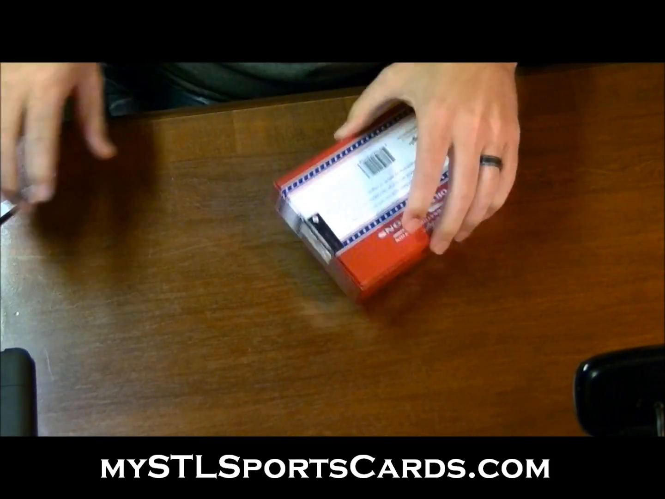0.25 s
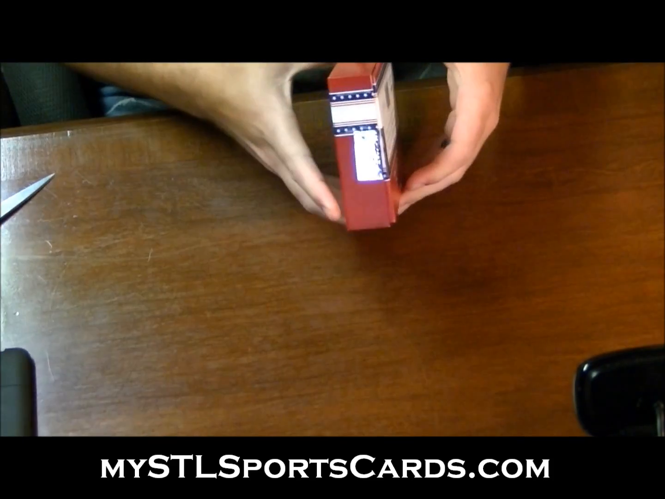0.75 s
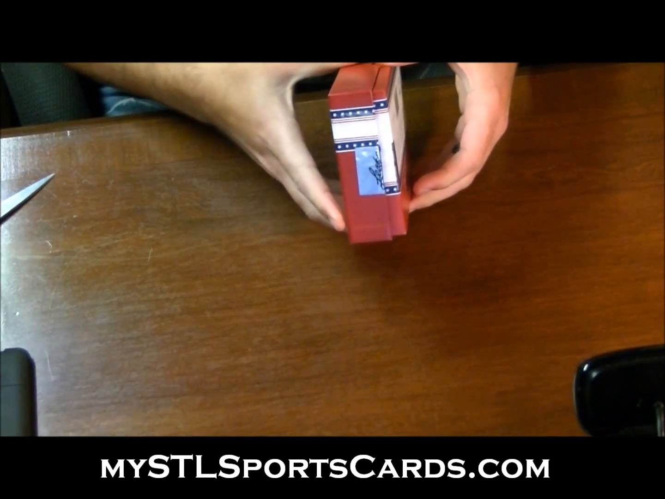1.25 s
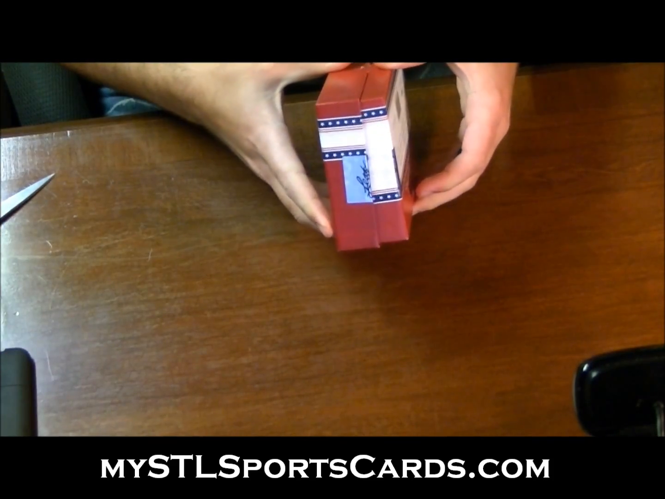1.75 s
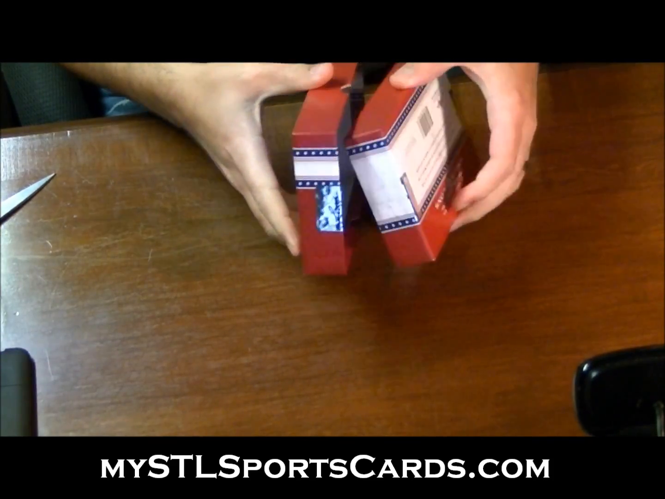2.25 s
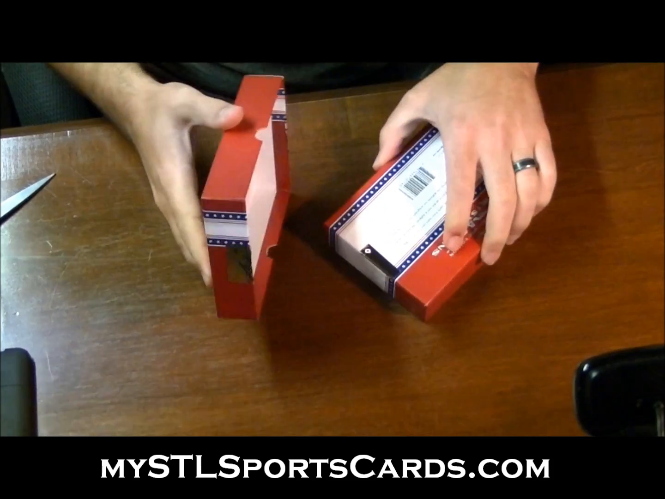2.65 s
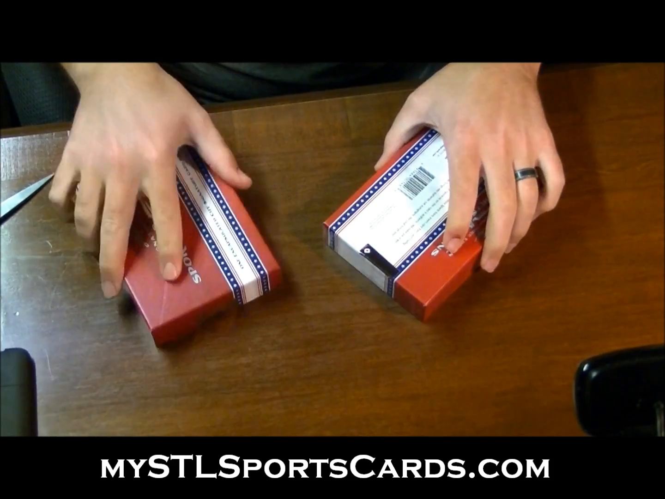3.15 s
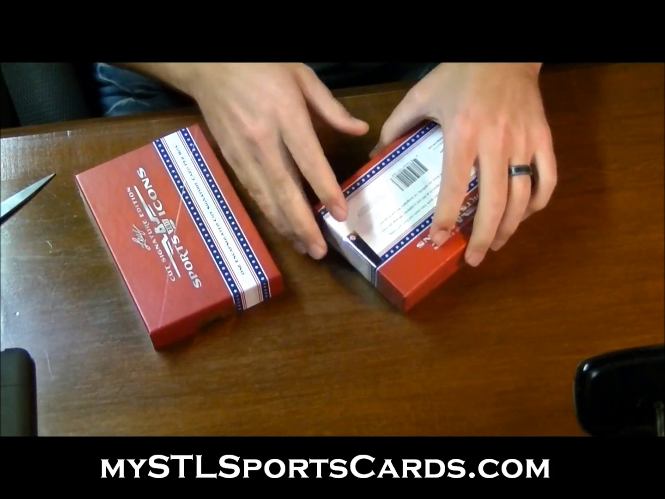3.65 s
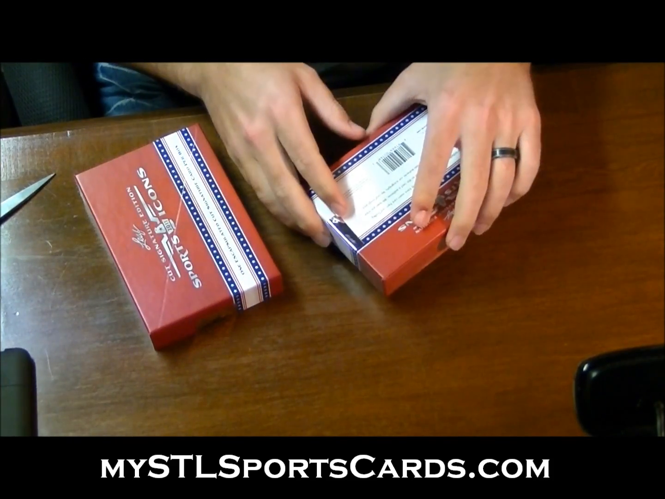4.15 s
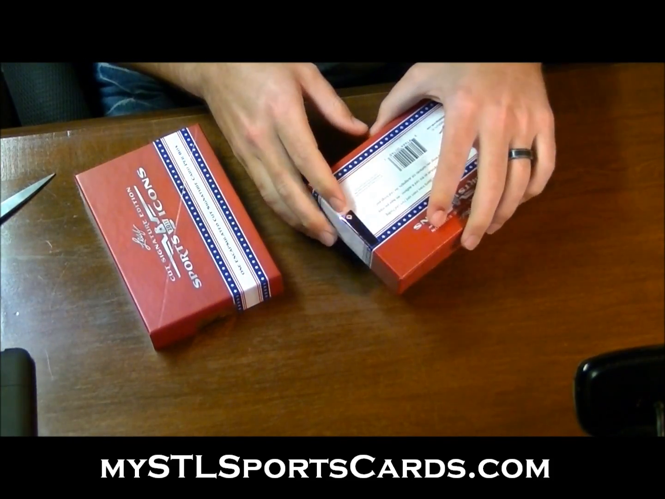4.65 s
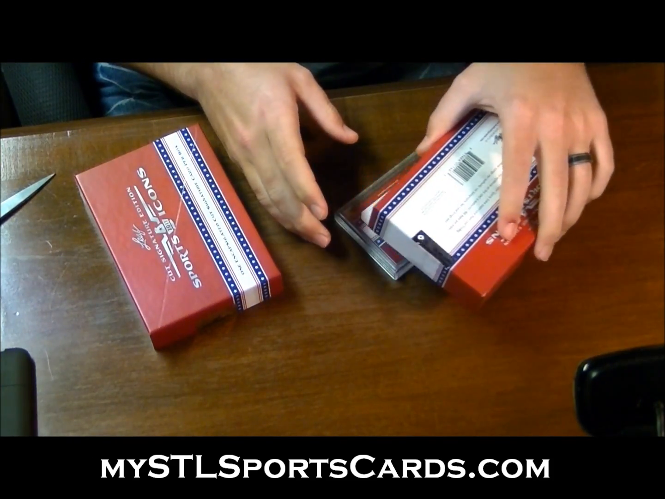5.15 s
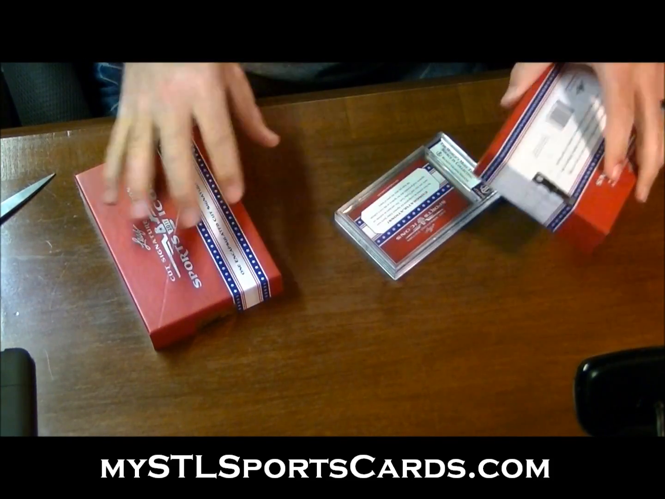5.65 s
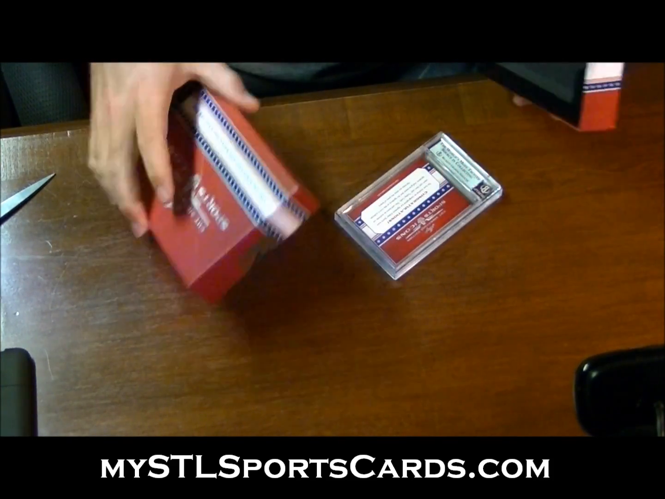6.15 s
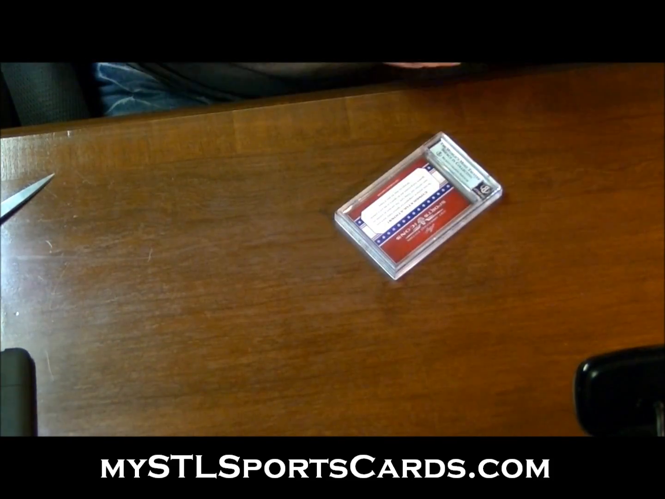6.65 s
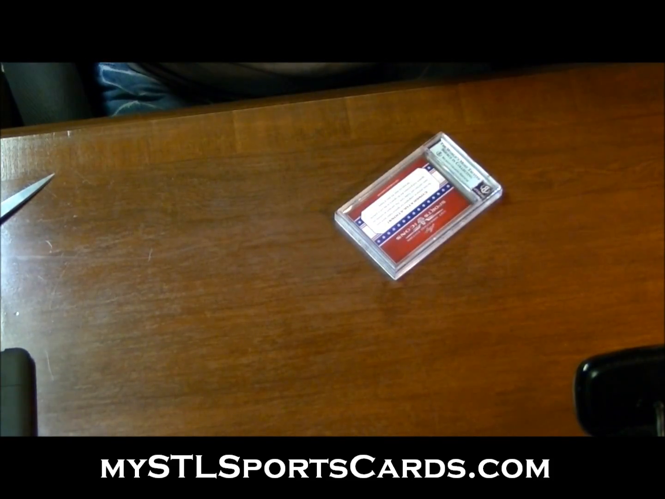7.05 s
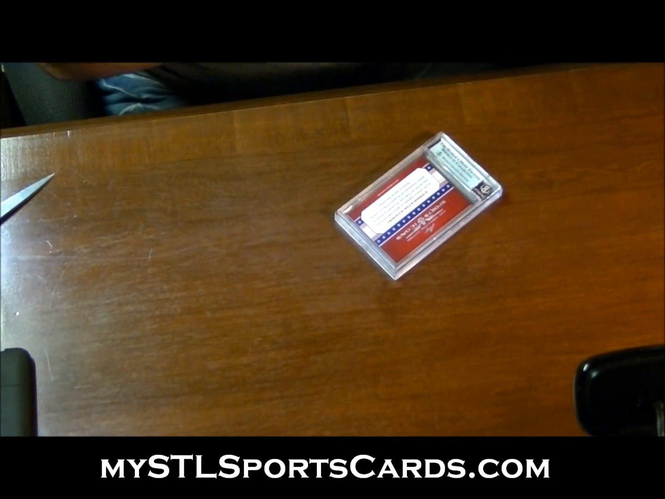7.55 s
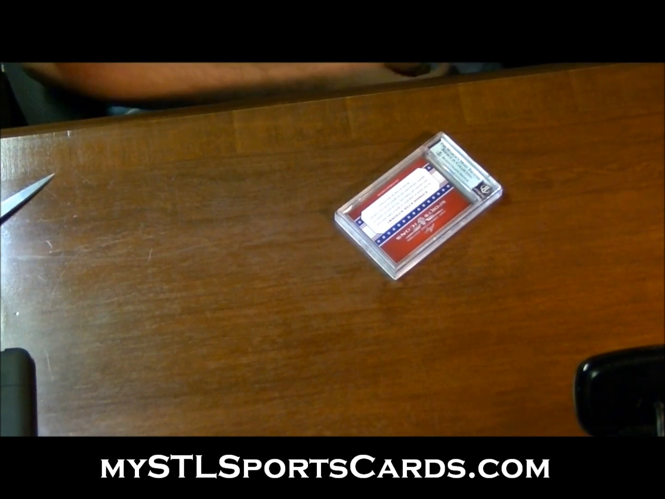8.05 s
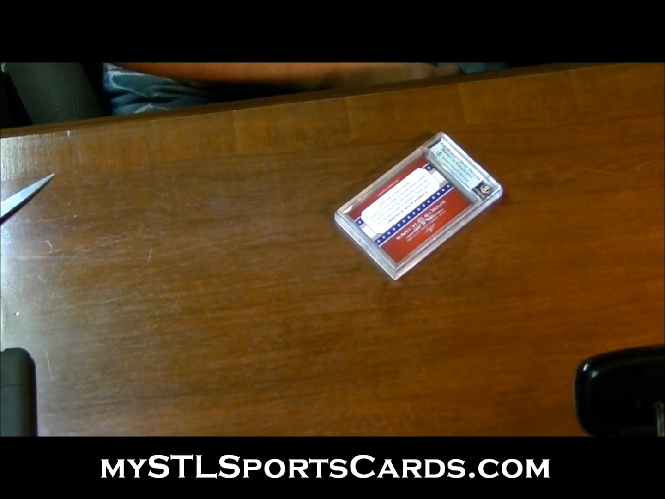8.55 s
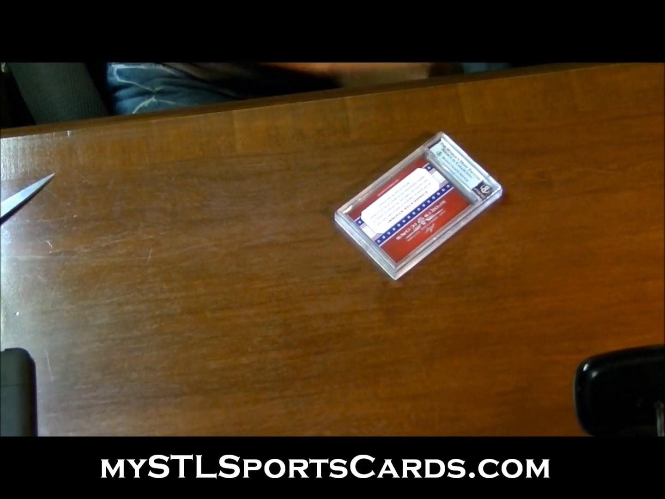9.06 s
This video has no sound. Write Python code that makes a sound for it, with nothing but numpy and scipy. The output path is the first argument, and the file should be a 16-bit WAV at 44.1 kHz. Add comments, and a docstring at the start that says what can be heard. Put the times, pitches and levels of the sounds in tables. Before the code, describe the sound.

Close to a stereo microphone in a small quiet room, scissors drop with a short metallic clatter on a wooden desk. A cardboard lid scrapes faintly off its box, squeaking as it comes free. Box and lid land with firm hollow knocks, then a hard plastic card holder rattles rapidly. Softer box bumps and dry rubbing follow, ending with a sleeve brush over steady faint room tone.

```python
"""In a small quiet room, close to a two-port desk microphone: scissors are dropped on a wooden desk, a cardboard
lid slides off its box, lid and box are set down, a plastic card holder rattles inside, then boxes and sleeves
rub close by. Blows ring the modes (natural pitches) of what is struck and thud the desk; rubbing is
dense tiny slips heard through cardboard; squeaks are short rings. Echoes and a steady room tone lie around it."""
import sys
import numpy as np
from scipy import signal
from scipy.fft import rfft, irfft, next_fast_len
from scipy.io import wavfile
from scipy.ndimage import uniform_filter1d, map_coordinates

SR = 44100
rng = np.random.default_rng(int(sys.argv[2]) if len(sys.argv) > 2 else 0)


def master(y):
    """Save y as 16-bit WAV."""
    cut = np.clip(np.atleast_2d(y).T, -1, 1)
    pcm = np.round(cut * 32767)  # scale
    wavfile.write(sys.argv[1], SR, pcm.astype(np.int16))


N = 410129
TIME_S = np.arange(N) / SR

# Blows of scissors, card holder, and lid and box; crack is relative to the low ring:
# (time [s], low ring peak [dB], low ring [Hz], upper ring [Hz], crack [dB], left minus right [dB])
SCISSOR_BLOWS = [(0.137, -32, 1155, 2000, -21, 6), (0.161, -21.5, 1150, 1700, 1, 0),
                 (0.168, -20, 1010, 3130, 3.5, 0), (0.177, -26, 980, 1690, -15, 5),
                 (0.216, -20.5, 1020, 1740, -10.5, 0), (0.234, -24, 940, 1960, -13, 9),
                 (0.259, -26, 867, 1680, -30, -3)]
HOLDER_BLOWS = [(3.981, -35.5, 856, 1730, -33, 2), (4.0205, -4.5, 917, 1860, -36, 3.5),
                (4.033, -10.5, 910, 2330, -30, 2.0), (4.045, -12.5, 834, 1880, -33.5, -1),
                (4.057, -21, 920, 1850, -30.5, -2), (4.0785, -9, 890, 2520, -23.5, 1.5),
                (4.098, -18, 930, 2520, -24.5, 3.0), (4.111, -4.5, 884, 1540, -14, 1),
                (4.124, -24, 880, 2420, -34, -2), (4.146, -33, 880, 1419, -28, 0.5),
                (4.182, -33, 900, 1830, -12, -4.5)]
BOX_BLOWS = [(2.555, -5.5, 790, 2290, -19, 0.5), (2.569, -7, 900, 2360, -42, 3.5),
             (2.644, -28, 850, 1800, -46, 3), (3.18, -13.5, 717, 1800, -54, 14),
             (3.186, -4.5, 766, 1800, -57, 2.5), (3.198, -6.5, 637, 1770, -32, -0.5),
             (3.214, -24.5, 650, 1720, -31, 0), (3.28, -43, 626, 1660, -42, 2.5),
             (6.542, -17.5, 797, 2070, -27.5, 3.5), (6.578, -29, 820, 1830, -44, 1),
             (6.83, -26.5, 700, 1630, -24.5, 2.5), (7.983, -43, 434, 1530, -40, 2),
             (8.688, -30, 597, 1470, -29, -1)]
# Soft bumps of the hand-held box; sharpness sets the crack and with it the upper modes:
# (time [s], low ring peak [dB], low ring [Hz], sharpness [dB])
BOX_BUMPS = [(0.516, -34.5, 580, -9.5), (0.549, -31, 350, -15), (2.066, -37.5, 333, -19),
             (2.336, -42.5, 916, -3), (2.825, -42.5, 286, -9), (3.381, -36, 790, -21),
             (3.397, -34.5, 764, -16), (3.554, -40.5, 645, -21), (5.85, -45, 833, -23),
             (5.875, -36, 680, -26), (5.963, -39, 740, -29), (6.545, -26.5, 328, -9), (6.652, -32, 730, -2),
             (6.667, -34, 770, -13), (6.832, -29.5, 284, -2.5), (6.887, -40, 350, -20),
             (7.054, -37, 431, -28), (7.239, -33.5, 416, -26), (7.268, -34.5, 385, -20),
             (7.378, -36, 367, -18), (7.398, -39, 360, -19), (7.64, -40.5, 367, -22),
             (7.791, -44, 238, -21), (7.808, -44.5, 340, -20), (8.737, -33.5, 370, 2),
             (8.787, -18, 428, -10), (8.795, -25, 367, 2), (8.826, -45, 390, -11)]
# What each thing rings with, levels relative to each other: (pitch [Hz], width [Hz], level [dB])
SCISSOR_MODES = [(305, 230, -13.5), (476, 230, -9.5), (758, 39, -13), (1012, 46, -2.5), (1206, 173, -3.5),
                 (1880, 250, -1.5), (2060, 48, -3), (2400, 434, -7), (2870, 250, -8), (3530, 680, -11.5)]
HOLDER_MODES = [(300, 120, 8), (640, 60, -25.5), (870, 50, -2.5), (930, 140, 8), (1150, 89, -7.5),
                (1360, 60, 1), (1910, 320, 4), (2240, 60, -3.5), (2470, 92, 0.5), (2940, 180, 1.5),
                (3520, 250, -6)]
BOX_MODES = [(237, 22, -3), (302, 41, -17), (370, 40, 3), (422.8, 62, 1.5), (570, 50, -10), (661, 10.18, 9),
             (773, 180, 1), (895, 80, 2.5), (1108, 72, 4.5), (1350, 130, -8), (1770, 154, 8),
             (2007, 200, 1.5), (2430, 130, -3.5), (2910, 110, 0.5), (3760, 420, -23.5)]
# Swings of the desk top; thud_db of each kind of blow is added: (pitch [Hz], 60 dB decay [s], level [dB])
DESK_MODES = [(73, 0.26, -45), (121, 0.11, -54), (196, 0.26, -38)]
# Scissors dragged and chattering on the desk: (time [s], level [dB])
SCISSOR_DRAG = [(0.13, -78), (0.138, -27), (0.154, -36.5), (0.162, -25), (0.206, -31.5), (0.216, -31.5),
                (0.268, -35), (0.42, -75)]
# A blade whines faintly as it slides before the drop: (time [s], level [dB])
BLADE_SLIDE = [(0.0, -65), (0.018, -49), (0.056, -65.5), (0.126, -58.5), (0.135, -49)]
# Lid sliding off its box: (time [s], level [dB])
LID_SLIDE = [(0.6, -59), (0.85, -61), (1.05, -57), (1.26, -53.5), (1.49, -55.5), (1.93, -51.5), (2.0, -53),
             (2.056, -46.5), (2.18, -77)]
# Cardboard walls of the sliding lid: (pitch [Hz], width [Hz], level [dB])
LID_WALLS = [(431.7, 85, -1.5), (840, 130, -2), (1980, 230, -4), (3430, 980, -16.5)]
# Colour of rubbing through cardboard, and of dry hiss: (pitch [Hz], width [Hz], level [dB])
RUB_BODY = [(378, 70, -3), (920, 450, -1.5), (1400, 1150, 0), (2060, 1300, -1), (3950, 1400, -10)]
RUB_HISS = [(5050, 920, -8), (6890, 1480, 2), (8660, 7000, -3), (11700, 2100, 0), (13900, 1500, -11.5)]
# Short strokes of hands and cardboard; rise and fall times act as at least 0.003 s:
# (peak time [s], dull part [dB], dry hiss [dB], time to rise 20 dB [s], time to fall 20 dB [s])
STROKES = [(2.029, -54.5, -43, -0.0454, -0.0051), (2.062, -40.5, -44.5, 0.11, -0.0439),
           (2.11, -50, -49.5, 0.04, 0.02), (2.83, -60.5, -71.5, -0.1, 0.1),
           (2.898, -59.5, -73.5, 0.18, 0.05), (3.356, -85, -67, .07, -0.6), (3.52, -63, -81, 0.65, 1.3),
           (3.74, -71, -63, .14, 0.37), (3.99, -49.5, -52, 0.04, .1), (4.014, -31.5, -52.5, 0.01, -0.1),
           (4.38, -79.5, -69, 0.7, 0.6), (6.568, -50.5, -58.5, -0.06, 0.27), (6.663, -53, -73, 0.09, 0.12),
           (6.78, -63, -73, 0.6, 0.08), (6.828, -42, -57, 0.0031, 0.0966), (6.95, -75, -79.5, 0.8, 0.7),
           (7.12, -60, -73, 0.06, .5), (7.234, -56, -55.5, 0.04, 0.24), (7.36, -58.5, -63, 0.08, 0.14),
           (7.435, -61, -60, -0.34, -0.06), (7.56, -84, -69, -0.7, 0.48), (7.713, -51.5, -58, -0.13, 0.05),
           (8.06, -83, -71.5, .5, 0)]
# One long brush of a sleeve over the box: (time [s], dull part [dB], dry hiss [dB])
BRUSH = [(8.44, -76.5, -93), (8.476, -63.5, -62), (8.55, -45.5, -47.5), (8.69, -46.5, -52),
         (8.77, -40.5, -46), (8.794, -35, -45), (8.85, -47, -49.5), (8.9, -44.5, -51.5), (8.99, -53.5, -57),
         (9.04, -63, -71), (9.07, -58, -62), (9.2, -75, -79)]
# Small snaps and squeaks of nails and card edges:
# (time [s], peak [dB], ring [Hz], second ring [Hz], length [ms])
TICKS = [(0.8618, -40.5, 1060, 2300, 2.9), (0.87, -36.5, 1010, 2360, 3), (2.018, -31, 1310, 5100, 14),
         (2.025, -26.5, 1280, 3380, 9.4), (2.053, -23, 2070, 3200, 5.9), (2.058, -30.5, 4900, 2800, 8.8),
         (2.876, -59, 1920, 3010, 4), (2.897, -42.5, 1860, 2270, 4), (4.5035, -40, 1960, 3020, 2),
         (6.66, -31.5, 1340, 2230, 9), (7.5569, -38, 1070, 2500, 2.8), (9.07, -47, 1049, 3430, 3.5),
         (9.1194, -47, 910, 2540, 3.1)]
# Echo bands: (centre [Hz], 60 dB decay [s], share unlike in the two ports [0-1])
ECHO_BANDS = [(293, .25, 0.9), (1000, .22, 0.3), (3100, 0.25, 1), (10000, 0.23, .95)]
# Tone colour of the background, before its overall level is set: (frequency [Hz], level per Hz [dB])
ROOM_TONE = [(18, -41.5), (30, -21.5), (48, -5.5), (167, -3.5), (267, -5.5), (472, -1.5), (552, -8),
             (754, -12.5), (815, -2), (881, -7.5), (1000, -7.5), (1440, -14), (2560, -16), (3320, -22),
             (15000, -35.5)]

SOFTENING = .15  # dB of contact time gained per dB of crack lost
BUMP_UPPER_HZ, BUMP_PAN_DB = 1240, 2
BUMP_CRACK_DB = -18.5  # crack = sharpness + this
LID_FREE_S, CAVITY_HZ, CAVITY_RISE_HZ_PER_S = 2.2, 1220, 60  # CAVITY_HZ is reached at LID_FREE_S
CAVITY_WAKES_S, CAVITY_WAKE_DB = 1.38, 10.5
LID_HISS_DB, DRAG_HISS_DB, HISS_GROWTH = -3.5, 6.5, 1.33  # hiss dB = this + growth x rub level dB
TICK_WIDTH_HZ_MS = 2000  # ring width x length: a longer squeak is purer
ROOM_DB, ROOM_TONE_DB = -10, -60
PORT_LAG_S, TOP_HZ = 6.8e-5, 15300


def undb(db):
    """Turn decibels into a plain multiplier."""
    return 10 ** (np.asarray(db) / 20)


def unit(x):
    """Scale to rms (average strength) 1."""
    return x / np.sqrt(np.mean(x ** 2))


def band(x, hz, width_hz):
    """Two-pole resonance, gain 1 at the centre."""
    return signal.lfilter(*signal.iirpeak(hz, hz / width_hz, SR), x)


def body(x, modes):
    """Sound heard through a set of resonances of alternating sign, rms 1."""
    heard = 0
    for k, (hz, width_hz, db) in enumerate(modes):
        heard = heard + (-1) ** k * undb(db) * band(x, hz, width_hz)
    return unit(heard)


def soften(x, top_hz):
    """A contact of finite length pushes little above top_hz."""
    return signal.sosfilt(signal.butter(3, top_hz, fs=SR, output="sos"), x)


def walk(rate):
    """Random levels, rate of them a second, with smooth slides between; spread near 1."""
    hold = int(SR / rate)
    steps = np.repeat(rng.standard_normal(N // hold + 1), hold)
    return 1.4 * uniform_filter1d(steps, hold)[:N]


def slips(spread_db):
    """Dense tiny slips of uneven size."""
    return unit(rng.standard_normal(N) * undb(spread_db * rng.exponential(size=N)))


def place(x, pan_db):
    """Share a sound between the ports, left louder than right by pan_db."""
    return x * undb(np.array([pan_db, -pan_db]) / 2).reshape(2, -1)


def curve(table, column=1):
    """Gain along one dB column of a table, practically silent outside it."""
    rows = np.array(table)
    return undb(np.interp(TIME_S, rows[:, 0], rows[:, column], -140, -140))


def desk_thud(t, thud_db):
    """The desk top swings up slowly and rings on."""
    thud = 0
    for hz, t60, db in DESK_MODES:
        swing = np.sin(2 * np.pi * hz * t) * (1 - np.exp(-t / 0.0092))
        thud = thud + undb(db + thud_db) * swing * 10 ** (-3 * t / t60)
    return thud


def blows(table, modes, upper_db, upper_growth, contact_ms, ring_s, damping, focus_db, grit, thud_db, edge):
    """Each blow pushes the modes, the low ones most near its pitch; a sharper crack makes contact shorter."""
    # contact_ms and ring_s hold for a crack of 0 dB; focus_db is lost per octave from the struck pitch
    out, t = np.zeros((2, N + SR)), np.arange(SR // 4) / SR
    thud = desk_thud(t, thud_db)
    for s, db, ring_hz, upper_hz, crack_db, pan_db in table:
        noise = rng.standard_normal((4, len(t)))
        fade = 10 ** (-3 * t / max(ring_s * undb(-damping * crack_db), .01))
        # time counted in contact lengths
        touch = t * 1000 / max(contact_ms * undb(-SOFTENING * crack_db), .2)
        chatter = (1 - np.exp(-edge * touch)) * (np.exp(-touch) + 0.22 * fade)
        # the contact drives the struck spot at its own pitch, roughened by grit
        tone = np.sin(2 * np.pi * ring_hz * t) * np.exp(-touch) / 8
        push = (tone + grit * noise[0]) * chatter
        upper_push = noise[1] * chatter
        low = undb(4.5) * band(push, ring_hz, 45)
        high = undb(1.0) * band(upper_push, upper_hz, 340)
        for hz, width_hz, mode_db in modes:
            if hz < 1300:
                octaves_off = abs(np.log2(hz / ring_hz))
                low = low + undb(mode_db - focus_db * octaves_off) * band(push, hz, width_hz)
            else:
                high = high + undb(mode_db - 5.5) * band(upper_push, hz, width_hz)
        low = soften(band(low, ring_hz, 3.0 * ring_hz), 1800) * fade
        low = low / abs(low).max()
        high = soften(high, 5200) * fade * undb(upper_db + upper_growth * crack_db) / abs(high).max()
        # crack: hiss partly unlike in the two ports
        hiss = body(noise[2] + 2.0 * noise[3] * [[1], [-1]], RUB_HISS)
        crack = hiss * (chatter * fade ** 0.91 + 0.76 * np.exp(-2.5 * touch))
        knock = place(low + thud, pan_db) + high + undb(crack_db) * crack
        i = int(s * SR)
        out[:, i:i + len(t)] += undb(db) * knock
    return out[:, :N]


def scissor_blows():
    """Dropped scissors: hard blows that ring the scissors and thud the desk."""
    return blows(SCISSOR_BLOWS, SCISSOR_MODES, upper_db=12.5, upper_growth=0.27, contact_ms=2.3, ring_s=0.073,
                 damping=0.64, focus_db=2.0, grit=0.5, thud_db=11, edge=9.5)


def holder_blows():
    """Rattling plastic holder: a quick run of blows with a short ring."""
    return blows(HOLDER_BLOWS, HOLDER_MODES, upper_db=2.5, upper_growth=0.22, contact_ms=1.9, ring_s=0.047,
                 damping=0.38, focus_db=11.5, grit=0.18, thud_db=-2.0, edge=2.3)


def box_blows():
    """Lid and box set down: blows that ring the cardboard close to the struck pitch."""
    return blows(BOX_BLOWS, BOX_MODES, upper_db=11, upper_growth=.3, contact_ms=2.5, ring_s=0.066,
                 damping=0.031, focus_db=12.0, grit=0.36, thud_db=-3, edge=6.3)


def box_bumps():
    """Soft bumps of the hand-held box: longer contacts on the same cardboard modes."""
    bumps = [(s, db, hz, BUMP_UPPER_HZ, sharpness_db + BUMP_CRACK_DB, BUMP_PAN_DB)
             for s, db, hz, sharpness_db in BOX_BUMPS]
    return blows(bumps, BOX_MODES, upper_db=21.5, upper_growth=0.97, contact_ms=5, ring_s=0.071,
                 damping=0, focus_db=5.5, grit=0.6, thud_db=8.0, edge=2.5)


def scissor_drag():
    """Steel blades skid on wood and ring their own modes; a light slide wakes only one."""
    whine = unit(band(band(slips(1.5), 1760, 150), 1760, 480))
    skid = soften(body(slips(3), SCISSOR_MODES), 4500) * undb(2.5 * walk(120))
    return curve(BLADE_SLIDE) * whine + curve(SCISSOR_DRAG) * skid


def lid():
    """Cardboard slips on cardboard; the cavity between lid and box rises in pitch as it opens."""
    cavity_hz = CAVITY_HZ + CAVITY_RISE_HZ_PER_S * (TIME_S - LID_FREE_S)
    swing = 2 * np.pi * np.cumsum(cavity_hz) / SR
    # slow noise on both phases makes a narrow, unsteady tone
    wobble = signal.lfilter(*signal.butter(1, 55, fs=SR), rng.standard_normal((2, N)))
    cavity = unit(wobble[0] * np.cos(swing) + wobble[1] * np.sin(swing))
    # the gap opens and the cavity sings louder
    awake = np.clip((TIME_S - CAVITY_WAKES_S) / 0.13, 0, 1)
    cavity = undb(-12 + CAVITY_WAKE_DB * awake) * cavity
    walls = undb(-4.5) * soften(body(slips(1.4), LID_WALLS), 3900)
    return curve(LID_SLIDE) * undb(1.6 * walk(40)) * (cavity + walls)


def strokes():
    """Pressure of all strokes, for the dull part and for the hiss."""
    out = np.array([curve(BRUSH), curve(BRUSH, column=2)])
    for s, dull_db, hiss_db, rise_s, fall_s in STROKES:
        rise = (s - TIME_S) / max(rise_s, .003)
        fall = (TIME_S - s) / max(fall_s, .003)
        out = out + undb([[dull_db], [hiss_db]]) * undb(-20 * np.maximum(rise, fall))
    return out


def rubbing():
    """Uneven friction: a dull part through the cardboard and a dry hiss spread over the whole contact."""
    dull = soften(body(slips(2.2), RUB_BODY), 5000) * undb(1.7 * walk(60))
    wide_slips = slips(1.6) + 1.6 * slips(2.3) * [[1], [-1]]
    dry_hiss = body(wide_slips, RUB_HISS) * undb(1.3 * walk(90))
    rub, hiss = strokes()
    # sliding lid and skidding scissors hiss too, the more the harder they rub
    hiss = hiss + undb(LID_HISS_DB) * curve(LID_SLIDE) ** HISS_GROWTH
    hiss = hiss + undb(DRAG_HISS_DB) * curve(SCISSOR_DRAG) ** HISS_GROWTH
    return dull * rub + dry_hiss * hiss


def ticks():
    """A stiff edge lets go: a few ms of grit ring two short modes."""
    out, t = np.zeros(N + SR), np.arange(SR // 10) / SR
    for s, db, low_hz, high_hz, length_ms in TICKS:
        age = t * 1000 / length_ms
        grit = rng.standard_normal(len(t)) * (1 - np.exp(-5 * age)) * np.exp(-age)
        snap = undb(-30.5) * grit
        for hz in (low_hz, high_hz):
            snap = snap + band(band(grit, hz, TICK_WIDTH_HZ_MS / length_ms), hz, 1200)
        i = int(s * SR)
        out[i:i + len(t)] += undb(db) * snap / abs(snap).max()
    return out[:N]


def echoes(x):
    """Small-room tail: bands of noise, each fading at its own rate and partly unlike in the two ports."""
    t, tail = np.arange(SR // 2) / SR, 0
    for hz, t60, unlike in ECHO_BANDS:
        mid, side = band(rng.standard_normal((2, len(t))), hz, hz)
        both = mid + unlike * side * [[1], [-1]]
        tail = tail + both * 10 ** (-3 * t / t60) / np.sqrt(hz * t60)
    tail = tail * (t > .003)  # no echo in the first 3 ms
    tail = tail / np.sqrt(np.mean(np.sum(tail ** 2, axis=1)))
    return undb(ROOM_DB) * signal.fftconvolve(x, tail, axes=1)[:, :N]


def room_tone():
    """Steady background in half-octave bands that flicker a little; bass more alike in both ports."""
    size = next_fast_len(N)
    f, out = np.fft.rfftfreq(size, 1 / SR), 0
    hz, db = np.transpose(ROOM_TONE)
    shape = undb(np.interp(np.log(f + 1), np.log(hz), db))
    mid, side = (rfft(rng.standard_normal(size)) * shape for _ in range(2))
    side = side * np.clip(.5 + f / 4000, 0, 1)
    ports = np.array([mid + side, mid - side])
    for lo in 20 * 2 ** np.arange(0, 10, .5):
        part = (f >= lo) & (f < lo * 2 ** .5)
        out = out + undb(.8 * walk(9)) * irfft(ports * part, size)[:, :N]
    out = out / np.sqrt(np.mean(out.mean(axis=0) ** 2))
    return undb(ROOM_TONE_DB) * place(out, 1)


def scene():
    """Add up all nearby sounds, their echoes and the room tone."""
    near = scissor_blows() + holder_blows() + box_blows() + box_bumps()
    near = near + ticks() + scissor_drag() + lid() + rubbing()
    wet = echoes(near)
    # the desk lies nearer the right port, so the left hears it later
    late = map_coordinates(near[0], [np.arange(N) - PORT_LAG_S * SR], mode="nearest")
    return np.array([late, near[1]]) + wet + room_tone()


def record(dry):
    """The input rounds only the loudest peaks; the sound is dull above about 15 kHz."""
    rounded = .95 * dry / (.95 ** 4 + dry ** 4) ** .25
    return signal.sosfilt(signal.ellip(10, .2, 70, TOP_HZ, fs=SR, output="sos"), rounded)


dry = scene()
out = record(dry)
master(out)
```